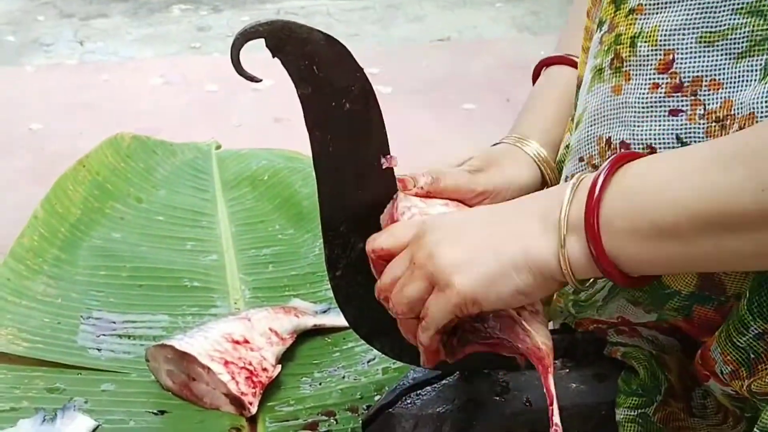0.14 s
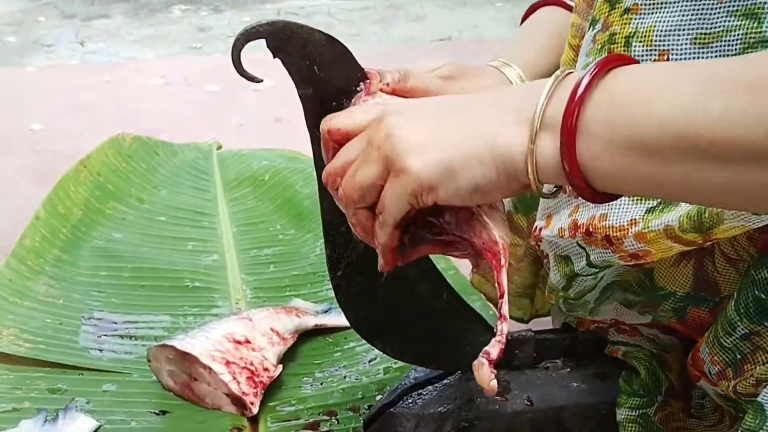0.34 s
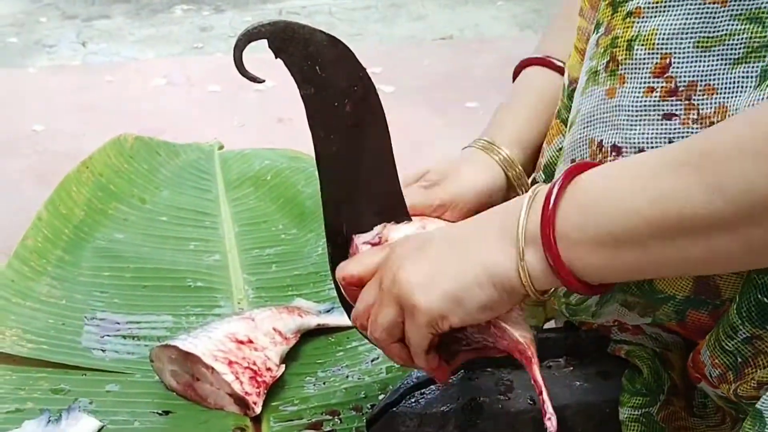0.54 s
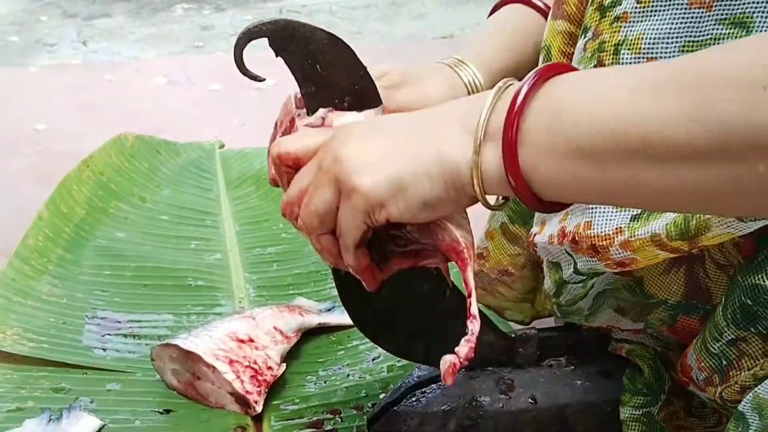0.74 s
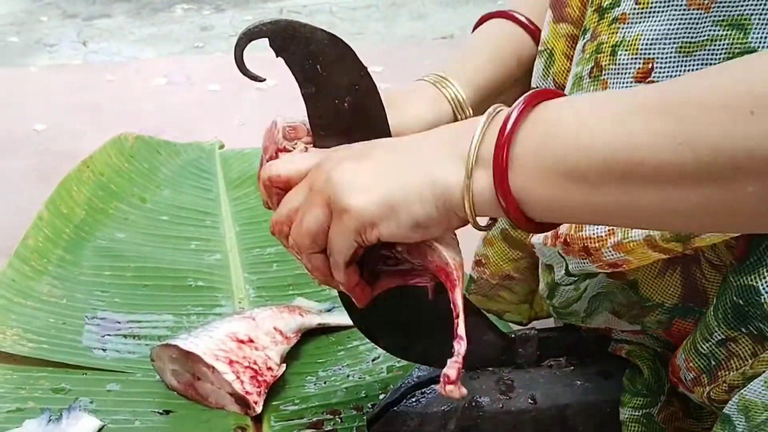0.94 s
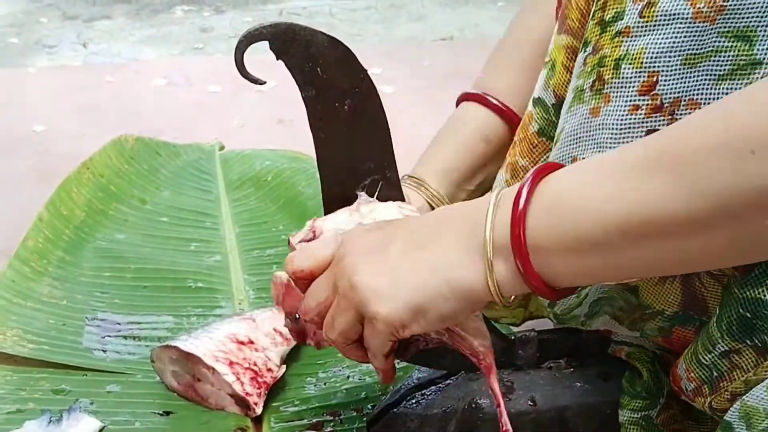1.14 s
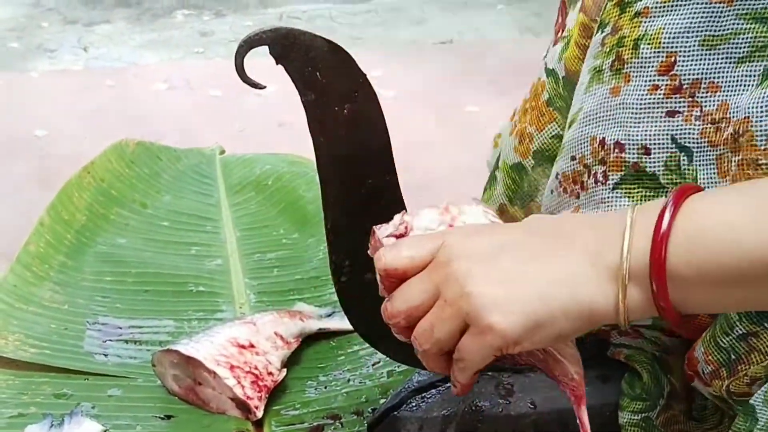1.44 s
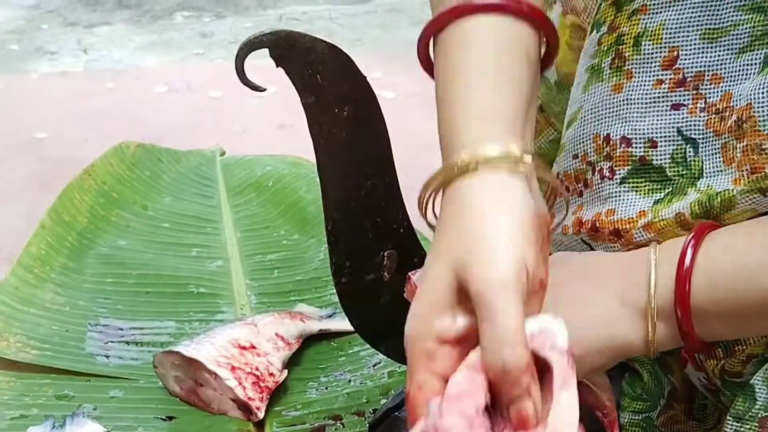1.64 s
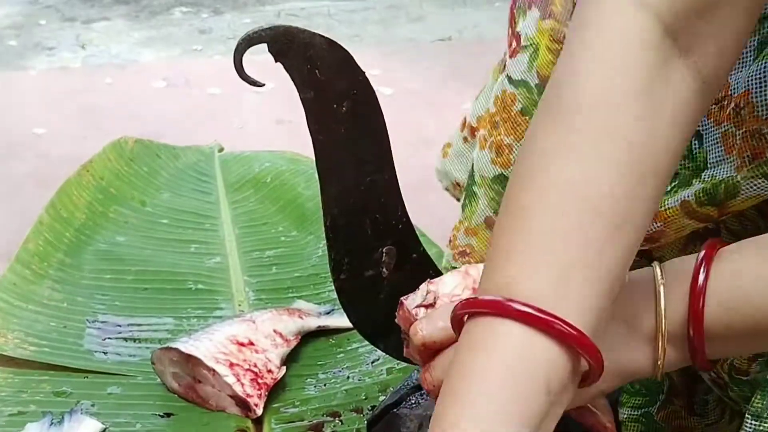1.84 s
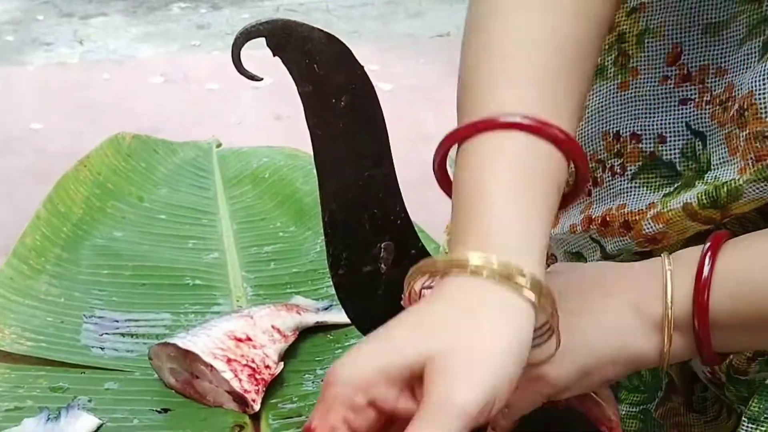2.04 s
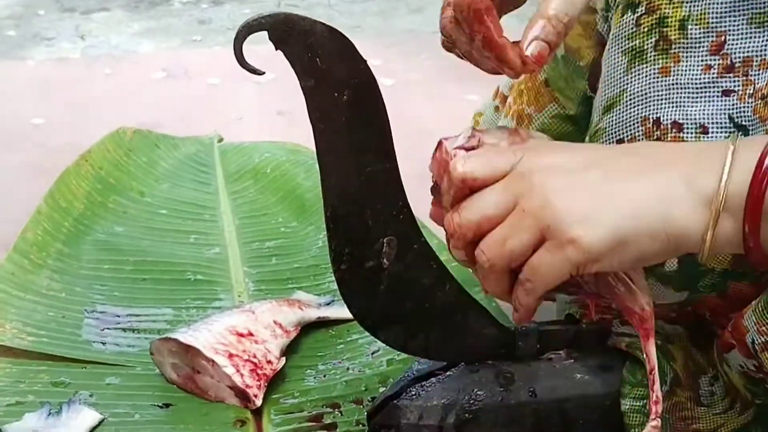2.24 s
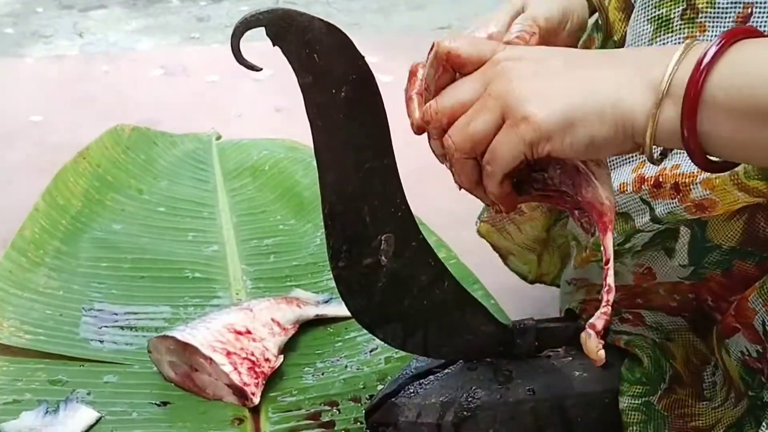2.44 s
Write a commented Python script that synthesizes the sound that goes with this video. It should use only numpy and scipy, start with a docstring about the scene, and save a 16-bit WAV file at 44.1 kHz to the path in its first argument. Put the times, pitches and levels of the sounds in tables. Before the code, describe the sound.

Fish cutting on a fixed curved iron blade, heard close on a phone outdoors. From 0.17 to 1.35 s, seven short gritty saw strokes rasp and crunch, with hard catches, a strong one near 0.97 s; bone snaps sharply at 1.2 s. Then only thin patchy hiss, soft low thumps and small watery blips, until a bright metal knock at 2.08 s rings and fades.

```python
"""A thin, patchy outdoor hiss (coloured noise) runs throughout, with soft low thumps and short watery
blips made of narrow noise. From 0.17 s hands saw a fish against a fixed curved iron blade: seven gritty
strokes of random slips that ring the blade, crunch, thud in the flesh and fizz; hard catches are puffs
of noise. At 1.2 s, in the seventh stroke, the bone snaps through. At 2.08 s a metal bangle or dish is
knocked and rings in short and long decaying sines. All of it is close to a phone."""
import sys
import numpy as np
from scipy import signal
from scipy.io import wavfile
from scipy.ndimage import uniform_filter1d

SR = 44100
rng = np.random.default_rng(int(sys.argv[2]) if len(sys.argv) > 2 else 0)


def gain_from_decibels(decibels):
    """Convert decibel values to linear amplitude factors."""
    exponent = np.asarray(decibels, float) / 20
    return 10 ** exponent


def generate_wav(sig):
    """Save sig (samples, or channels by samples) to the path in sys.argv[1] as 16-bit PCM at SR."""
    pcm = np.round(np.clip(np.atleast_2d(sig).T, -1, 1) * 32767).astype(np.int16)
    wavfile.write(sys.argv[1], SR, pcm)


N = 114660  # samples, 2.6 s

# Colour of the outdoor hiss: (frequency [Hz], gain [dB])
HISS_COLOUR = [(880, -53), (1500, -21.5), (2120, -12.5), (2370, -6), (2630, -5), (2880, -1), (3270, 1.5),
               (3830, 3), (4500, -8), (5300, -4), (6520, -6.5), (7460, -10.5), (8410, -47), (9000, -32.5),
               (11700, -71)]
# Swell of the hiss: (time [s], level before the lifts [dB], lower edge lift [dB], upper edge lift [dB])
HISS_SWELL = [(0, -58, -23, -17), (.15, -55.5, -22, -7), (.45, -54, 9, -3.5), (1.0, -52, -4.5, 2.5),
              (1.3, -54.5, 3.5, 0), (1.4, -54, -10, -2), (1.62, -55, -3.5, 2.5), (1.7, -51.5, -0.5, -1.5),
              (1.95, -52.5, 2.5, 1), (2.02, -51.5, -15, -2), (2.1, -50, 8, 1), (2.4, -51.5, 1.5, -3.5),
              (2.47, -50.5, -5.5, -1), (2.6, -54, 6.5, -1)]
# Patchiness of the hiss: (frequency [Hz], depth [dB])
HISS_PATCHINESS = [(1500, 8), (2800, 7.5), (3600, 4.5), (4500, 6.5), (5600, 6), (7600, 5.5)]
# Lower edge of the hiss: (from [Hz], to [Hz])
HISS_LOWER_EDGE = (1500, 2750)
# Upper edge of the hiss: (from [Hz], to [Hz])
HISS_UPPER_EDGE = (6300, 8200)
# Colour of the faint floor: (frequency [Hz], gain [dB])
FLOOR_COLOUR = [(30, -56.5), (70, -8.5), (100, -2), (160, -5.5), (400, -7.5), (560, -12), (800, -10.5),
                (1400, -20.5), (2500, -17), (7000, -15.5), (8500, -31.5), (15500, -32.5)]
# Soft low thumps: (time [s], level before a common trim [dB], pitch [Hz], length [s])
LOW_THUMPS = [(0.12, -60.5, 102, 0.12), (0.43, -59.5, 107, 0.16), (0.67, -52.5, 377, 0.073),
              (0.7, -63, 103.4, 0.1), (0.72, -62, 320, 0.089), (1.1, -62.5, 102, 0.27),
              (1.19, -55, 101, 0.078), (2.2, -70, 278, 0.42), (1.49, -54, 271, 0.05),
              (1.5, -62, 106, 0.073), (1.64, -59, 103, 0.13), (1.72, -56, 390, 0.039)]
# Watery blips: (time [s], level before a common trim [dB], pitch [Hz], length [s])
WATERY_BLIPS = [(0.015, -60.5, 1123, 0.05), (0.10, -53, 2447, 0.1), (0.19, -61, 1523, 0.067),
                (0.23, -54.5, 793, 0.14), (0.35, -56, 645, 0.045), (0.375, -50.5, 806, 0.053),
                (0.70, -55, 1126, 0.11), (0.78, -53, 577, 0.038), (1.435, -60.5, 1105, 0.061),
                (1.55, -55, 802, 0.12), (1.68, -53.5, 1993, 0.062), (1.85, -55, 2390, 0.086),
                (1.0, -51.5, 943, 0.11), (1.06, -47, 985, 0.079), (1.72, -50, 2460, 0.056),
                (1.635, -64, 1550, 0.086), (1.3, -64, 2460, 0.11), (1.8, -60, 1260, 0.055),
                (1.81, -58, 1730, 0.031), (1.92, -52, 2350, 0.077), (1.875, -59.5, 823, 0.024),
                (2.0, -53, 725, 0.034), (2.09, -50.5, 516, 0.046), (2.13, -52.5, 780, 0.1),
                (2.53, -51, 1322, 0.076)]
# Modes of the struck metal: (frequency [Hz], relative level [dB], decay t60 before damping [s])
METAL_MODES = [(1373, 1, .13), (1588, -19, .6), (2059, -4, .1), (2132, -1, .85), (2223, 0, .33),
               (2299, -12, .45), (2487, -18, 5.0), (2552, -4, .12), (2880, -15, 5.0), (3199, -1, .07),
               (3273, -8, 3.0), (3591, -9, .15), (4048, -18, 2.7), (4247, -23, 3.2), (4613, -16, 1.4),
               (4791, -20, 3.0), (4985, -18, 2.6), (5173, -15, .87), (5370, -3, .1), (8699, -20, .17),
               (8930, -21, .15)]
# Colour of the knock's crack: (frequency [Hz], gain [dB])
CRACK_COLOUR = [(700, -58), (1200, -47), (1360, -1), (1860, -5.5), (2210, -0.5), (2730, -7), (3250, -5.5),
                (3600, -20), (4300, -24.5), (5400, -6), (6100, -34), (8060, -36), (8770, -20.5),
                (12000, -52), (15600, -66)]
# Bones and scales catching: (time [s], level before trim [dB], treble relative to it before trim [dB])
BONE_CATCHES = [(0.2247, -26, -40), (0.2551, -25, -7), (0.2922, -34, -32), (0.38, -37, -31),
                (0.4344, -28, -25), (0.5808, -22, -22), (0.6085, -27.5, -5), (0.6471, -23.5, -25),
                (0.8128, -32, -30), (0.9649, -22.5, -37), (1.0497, -27, -30), (1.1752, -33, -8),
                (1.1992, -14.5, -2), (1.3128, -43, -24)]
# Rings of the iron blade: (frequency [Hz], width before broadening [Hz], relative level [dB])
BLADE_MODES = [(2290, 130, -1), (2450, 140, -1), (2890, 64, -4), (3250, 100, 0), (3590, 70, -3),
               (3740, 50, -4), (3980, 90, -2)]
# Broad crunch: (frequency [Hz], gain [dB])
GRIT_COLOUR = [(1000, -27.5), (1700, -35.5), (1990, -10), (2350, 3.5), (2850, -5), (3250, -1.5),
               (4000, -6.5), (4460, -11.5), (7030, -17), (8000, -41), (10400, -95.5)]
# Thud in the flesh: (frequency [Hz], gain [dB])
BODY_COLOUR = [(150, -50), (250, -26), (392, -29), (848, -1), (900, 3.5), (1080, -12.5), (1170, 2),
               (1580, -6.5), (1900, 0), (2470, -64)]
# Fizz on the edge: (frequency [Hz], gain [dB])
FIZZ_COLOUR = [(4710, -40.5), (8000, -2), (8430, -15.5), (8640, -7.5), (9630, -13.5), (9900, -5),
               (10400, 1), (12600, -11.5), (14400, -5.5), (15500, -11.5)]
# Seven lists, one per saw stroke: (time [s], grit level [dB], then relative to the grit:
# low blade ring [dB], flesh body [dB], edge fizz [dB])
SAW_STROKES = [
    [(0.17, -62.5, 5, -18, -48.5), (0.188, -48.5, -4, -32, -29), (0.196, -73, 18, -7, -36),
     (0.218, -82, 22, -21, -28.5), (0.222, -50, 1.5, -23, -7.5), (0.29, -42, -0.5, -32, -23.5),
     (0.3, -40.5, 2.5, -17.5, -11.5), (0.35, -61, 3.5, -12, -20)],
    [(0.35, -61, 10, -12, -6), (0.36, -64, 7, -18, -24), (0.378, -46.5, 5, -11.5, -2),
     (0.39, -38, -4, -26, -16), (0.414, -38, -1.5, -25, -24), (0.43, -35.5, -8.5, -16.5, -20),
     (0.484, -48.5, 2.5, -22, -21), (0.495, -62, 4, -23, -8), (0.53, -63, -11, -23, -27)],
    [(0.531, -57, -5, -24, -29), (0.572, -57, 7, -25, -53), (0.582, -43, -6, -19.5, -12),
     (0.6, -53.5, 13.5, 6, -36), (0.616, -36.5, -3.5, -17.5, -22), (0.658, -44, 11, 0, -6),
     (0.69, -38, -1, -9.5, -30), (0.712, -71, -3, 15.5, 3), (0.72, -52, 7, -3, -13)],
    [(0.72, -60.5, 2, 1, -27), (0.756, -46, -0.5, -35, -6), (0.784, -41.5, -5, -24, -17),
     (0.792, -48.5, 5.5, -25, -10), (0.808, -44.5, 2, -32, -20), (0.816, -40.5, -0.5, -43, -20.5),
     (0.84, -50.5, 6.5, -20, -14), (0.858, -58, 12, -30, -17), (0.89, -67, 9, -31, -14)],
    [(0.89, -62, -7, -35, -15), (0.902, -58, 15, -28.5, -21), (0.916, -50, 1, -35, -27),
     (0.928, -48, 0, -13.5, -19), (0.968, -32, 4.5, -11, -6.5), (1.0, -54.5, 8.5, 3.5, -12),
     (1.03, -62, 1, 4.5, -3)],
    [(1.03, -54, 5, -5, -8), (1.044, -64, 7, -11, -5), (1.048, -39.5, -1, -17, -23),
     (1.058, -47, 10, -17, -11), (1.066, -40.5, 0.5, -18, -17), (1.106, -44, 2.5, -8, -11),
     (1.112, -54, 7.5, -3.5, -12), (1.15, -58, 5, -4, -22)],
    [(1.15, -59.5, -4, -9, -25), (1.178, -37.5, 3, -18, -11.5), (1.19, -48.5, -1, -0.5, -8),
     (1.2, -36, 15, -2, -43), (1.216, -49, 2, -4, -16), (1.248, -56, -8, -0.5, -7.5),
     (1.296, -70, 7, 3, -14), (1.312, -57, -17, -24, -5), (1.35, -70, -12, -33, -28)],
]


def evened(x):
    """Scales to rms 1."""
    return x / np.sqrt(np.mean(x ** 2) + 1e-20)


def drift(shape, size):
    """Random wander of rms 1, smoothed twice over size samples."""
    noise = rng.standard_normal(shape)
    return evened(uniform_filter1d(uniform_filter1d(noise, size), size))


def read(points, hz):
    """Reads a spectrum table on a log frequency axis."""
    f, value = np.transpose(points)
    return np.interp(np.log(hz + 1), np.log(f + 1), value)


def add(mix, s, sound):
    """Mixes a sound in at time s."""
    part = mix[round(s * SR):][:len(sound)]
    part += sound[:len(part)]


def band(x, hz, kind):
    """A steep filter."""
    return signal.sosfilt(signal.butter(4, hz, kind, fs=SR, output="sos"), x)


def resonate(x, hz, width):
    """A resonance of gain 1: shift to 0 Hz, smooth, shift back."""
    turn = np.exp(2j * np.pi * hz * np.arange(len(x)) / SR)
    r = np.exp(-np.pi * width / SR)
    return 2 * (turn * signal.lfilter([1 - r], [1, -r], x / turn + 1e-18)).real


def resonate_twice(x, hz, width):
    """Two equal resonances in a row, for steeper skirts."""
    return resonate(resonate(x, hz, width), hz, width)


def colour(x, points, patch_db=0, size=256, bins=3, frames=8, top=3):
    """Shapes short-time spectra by a table, with drifting random patches."""
    hz, _, z = signal.stft(x, SR, nperseg=size, noverlap=size * 3 // 4)
    field = rng.standard_normal(z.shape[::-1]).T
    field = uniform_filter1d(uniform_filter1d(field, bins, 0), frames, 1)
    field = np.minimum(evened(field), top)
    field = 1.41 * np.tanh(field)  # patches have sharp rims
    depth = read(patch_db, hz)[:, None] if np.ndim(patch_db) else patch_db
    z = z * gain_from_decibels(read(points, hz)[:, None] + depth * field)
    return signal.istft(z, SR, nperseg=size, noverlap=size * 3 // 4)[1][:len(x)]


def burst(points, t60, length=.3):
    """A dying puff of noise through a causal filter of the given colour, peaking at 2."""
    t = np.arange(0, length, 1 / SR)
    gain_db = np.maximum(read(points, abs(np.fft.fftfreq(2048, 1 / SR))), -90)
    # minimum phase: the filter has no ringing ahead of the attack
    response = np.exp(np.conj(signal.hilbert(np.log(gain_from_decibels(gain_db)))))
    taps = np.fft.ifft(response).real[:1024]
    puff = rng.standard_normal(len(t)) * gain_from_decibels(-60 * t / t60) * np.minimum(t / .0005, 1)
    puff = signal.fftconvolve(puff, taps)[:len(t)]
    return 2 * puff / abs(puff).max()


def hiss():
    """Streaky outdoor hiss that swells slowly, its edges coming and going, over a faint floor."""
    t = np.arange(N) / SR
    s, db, low_db, top_db = np.transpose(HISS_SWELL)
    bed = colour(rng.standard_normal(N), HISS_COLOUR, HISS_PATCHINESS, size=1024, bins=5, frames=18, top=0.92)
    bed = evened(bed)
    for edge_hz, lift_db in ((HISS_LOWER_EDGE, low_db), (HISS_UPPER_EDGE, top_db)):
        edge = signal.sosfiltfilt(signal.butter(3, edge_hz, "band", fs=SR, output="sos"), bed)
        bed = bed + edge * (gain_from_decibels(np.interp(t, s, lift_db)) - 1)
    floor = evened(colour(rng.standard_normal(N), FLOOR_COLOUR, 1.56, size=1024, bins=4, frames=8))
    return bed * gain_from_decibels(np.interp(t, s, db)) + gain_from_decibels(-70) * floor


def fuzzy_tones(rows, width_hz):
    """Noise through narrow resonances gives short fuzzy tones that swell and fade."""
    trim_db = -7.5
    out = np.zeros(N)
    for s, db, hz, length in rows:
        t = np.arange(0, length, 1 / SR)
        fuzz = resonate_twice(rng.standard_normal(SR // 2), hz, width_hz)
        fuzz = evened(fuzz[2000:][:len(t)])  # skip the build-up of the resonance
        add(out, s, gain_from_decibels(db + trim_db) * fuzz * np.sin(np.pi * (t / length) ** 0.49))
    return out


def thumps():
    """Soft low thumps: fuzzy tones of narrow low noise."""
    return fuzzy_tones(LOW_THUMPS, width_hz=50)


def blips():
    """Short watery blips: fuzzy tones from wider resonances."""
    return fuzzy_tones(WATERY_BLIPS, width_hz=90)


def random_blips():
    """Tiny faint blips of narrow noise, scattered at random in time, level, pitch and length."""
    count = 45
    lowest = (0, -66, 1150, .02)  # time [s], level before trim [dB], pitch [Hz], length [s]
    spread = (N / SR - .1, 8, 1400, .03)
    return fuzzy_tones(rng.random((count, 4)) * spread + lowest, width_hz=90)


def knock():
    """Struck metal: a crack, one bounce, short and long decaying sine modes that waver and are slowly damped."""
    knock_s, bounce_s = 2.0835, .007  # the bounce follows the knock by this much
    ring_db, crack_db, bounce_db = -37.5, -23.5, -12  # bounce relative to crack
    waver_db, damp_db = 1, -5  # damping reached at half a second
    out, t = np.zeros(N), np.arange(0, .6, 1 / SR)
    ring = np.zeros(len(t))
    for (hz, db, t60), waver in zip(METAL_MODES, drift((len(METAL_MODES), len(t)), 900)):
        ring += gain_from_decibels(db - 60 * t / t60 + waver_db * waver) * np.sin(2 * np.pi * hz * t)
    add(out, knock_s, gain_from_decibels(ring_db + damp_db * (t / .5) ** 2) * np.minimum(t / .001, 1) * ring)
    add(out, knock_s, gain_from_decibels(crack_db) * burst(CRACK_COLOUR, t60=.04))
    add(out, knock_s + bounce_s, gain_from_decibels(crack_db + bounce_db) * burst(CRACK_COLOUR, t60=.07))
    return out


def blade(x):
    """Short rings of the iron blade: resonances, each wandering randomly in level."""
    wander_db, broadening = 2.5, 2.4
    out = np.zeros(N)
    for (hz, width, db), wander in zip(BLADE_MODES, drift((len(BLADE_MODES), N), 1500)):
        ring = resonate_twice(x, hz, broadening * width) / np.sqrt(width)
        out += gain_from_decibels(db + wander_db * wander) * ring
    return out


def snap():
    """The bone giving way: a low sine thud, a puff from the flesh and a scattered noise tail."""
    snap_s, thud_hz = 1.199, 200
    tail_colour = [(300, -40), (1000, 0), (3000, 7.5), (8000, 3), (15000, -15.0)]  # (Hz, dB)
    out, t = np.zeros(N), np.arange(0, .3, 1 / SR)
    thud = gain_from_decibels(-54 - 60 * t / 0.14) * np.sin(2 * np.pi * thud_hz * t)
    add(out, snap_s, thud * np.minimum(t / 0.0044, 1))
    add(out, snap_s, gain_from_decibels(-40.5) * burst(BODY_COLOUR, t60=0.082))
    add(out, snap_s, gain_from_decibels(-43.5) * burst(tail_colour, t60=0.36))
    return out


def catches():
    """Single hard catches: gritty puffs with a treble tick; the puffs also ring the blade."""
    puff_trim_db, tick_trim_db, ring_db = -10, -11.5, -9
    out, puffs = np.zeros(N), np.zeros(N)
    for s, db, treble_db in BONE_CATCHES:
        puff = gain_from_decibels(db + puff_trim_db) * burst(GRIT_COLOUR, t60=0.022)
        tick = gain_from_decibels(db + treble_db + tick_trim_db) * burst(FIZZ_COLOUR, t60=0.0075)
        add(puffs, s, puff)
        add(out, s, puff + tick)
    return out + gain_from_decibels(ring_db) * evened(blade(puffs)) * np.std(puffs)


def clumps():
    """Level wander that bunches the slips, a few milliseconds at a time."""
    clump_db, clump_s = 1.5, .004
    return gain_from_decibels(clump_db * drift(N, round(clump_s * SR)))


def strokes():
    """Uneven slips of scale and bone ring the blade, crunch, thud in the flesh and fizz on the edge."""
    slips_per_s, slip_spread_db, ring_share = 6000, 1.8, .36
    split_hz, grit_top_hz = 2750, 7900
    t = np.arange(N) / SR
    s, level_db, low_db, body_db, fizz_db = np.vstack(SAW_STROKES).T

    # sparse impulses of uneven strength over a steady rub
    slips = gain_from_decibels(slip_spread_db * np.minimum(rng.exponential(1, N), 4)) * rng.standard_normal(N)
    slips = slips * (rng.random(N) < slips_per_s / SR)
    slips = slips + 0.4 * rng.standard_normal(N)

    ring = evened(blade(slips))
    crunch = evened(colour(slips, GRIT_COLOUR, patch_db=4, bins=2, frames=14))
    grit = ring_share * ring + (1 - ring_share) * crunch
    high = band(band(grit, split_hz, "high"), split_hz, "high")
    high = band(high, grit_top_hz, "low")
    low = band(grit, split_hz, "low")
    low = band(band(low, 1990, "high"), 1960, "high")
    body = colour(slips, BODY_COLOUR, 8.1, size=512, bins=2, frames=14)
    fizz = colour(rng.standard_normal(N), FIZZ_COLOUR, 8, bins=3, frames=60, top=3.0)

    out = np.zeros(N)
    for layer, db in ((high, 0), (low, low_db), (body, body_db), (fizz, fizz_db)):
        level = gain_from_decibels(np.interp(t, s, level_db + db, left=-120, right=-120))
        out += level * evened(layer * clumps())
    return out


def scene():
    """All sources at one microphone."""
    mix = strokes() + catches() + snap() + knock()
    mix = mix + blips() + thumps() + random_blips() + hiss()
    return mix[None]


def low_pass(x):
    """Removes everything above the highest recorded frequency."""
    return signal.sosfilt(signal.butter(12, 16510, fs=SR, output="sos"), x)


def record(dry):
    """The phone's microphone band: a low cut and a steep upper edge."""
    low_cut_hz, edge_hz = 68, 15700
    edge = signal.firwin(255, edge_hz, window=("kaiser", 4), fs=SR)[None]
    mix = signal.oaconvolve(band(dry, low_cut_hz, "high"), edge, "same")
    return low_pass(mix)


dry = scene()
out = record(dry)
generate_wav(out)
```